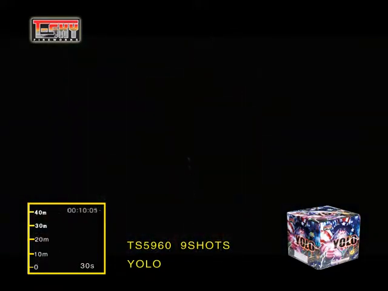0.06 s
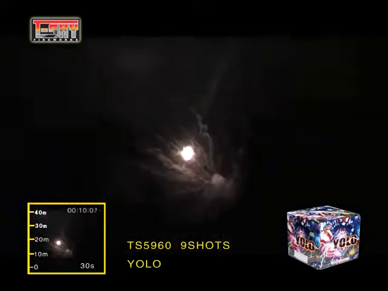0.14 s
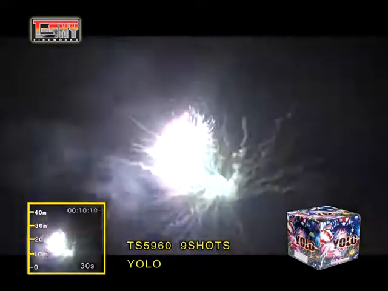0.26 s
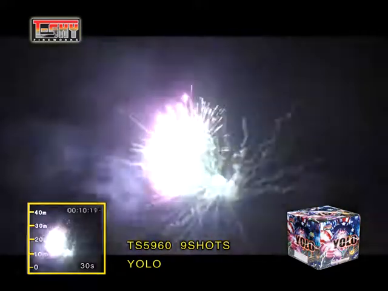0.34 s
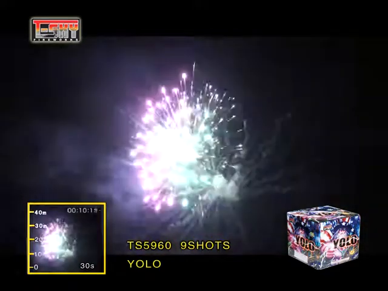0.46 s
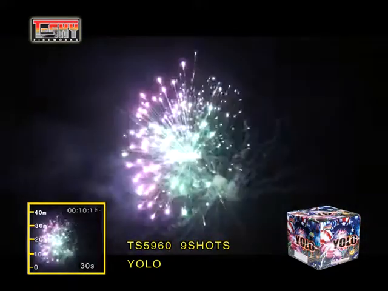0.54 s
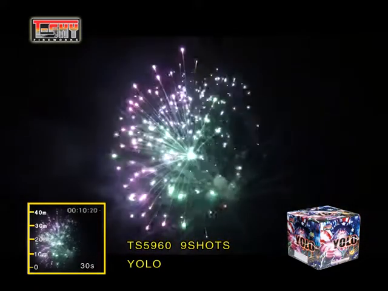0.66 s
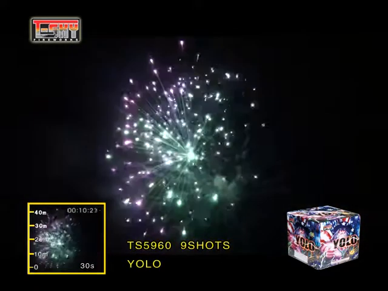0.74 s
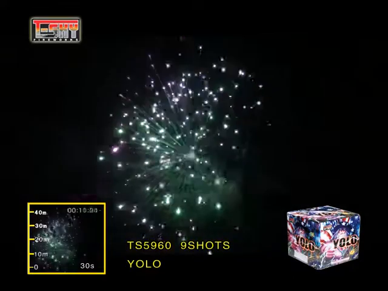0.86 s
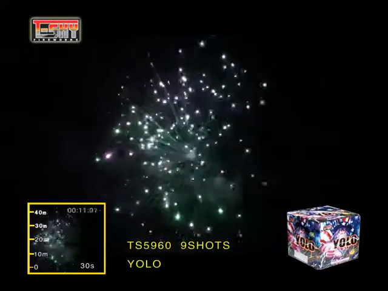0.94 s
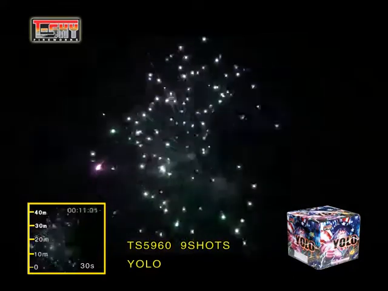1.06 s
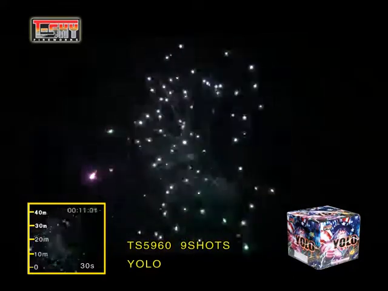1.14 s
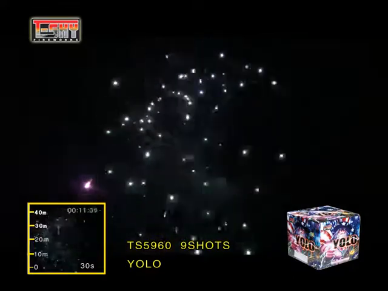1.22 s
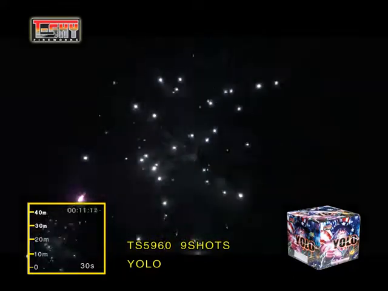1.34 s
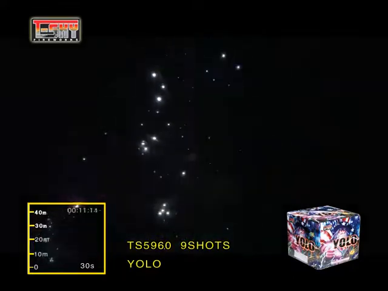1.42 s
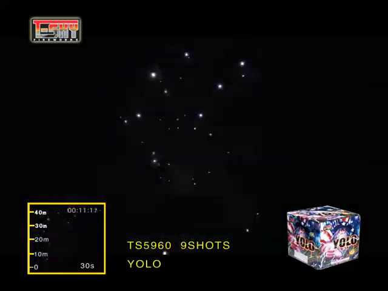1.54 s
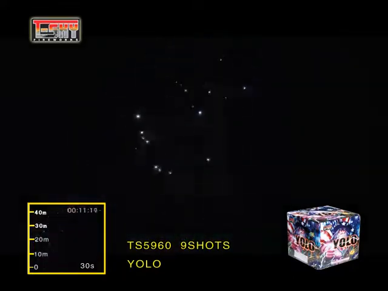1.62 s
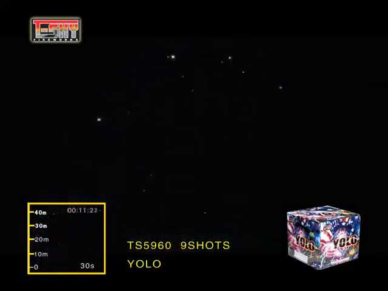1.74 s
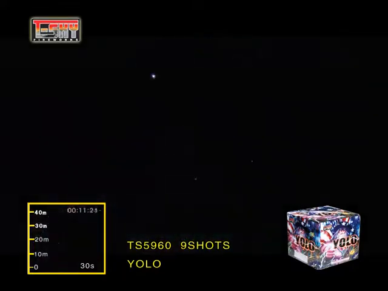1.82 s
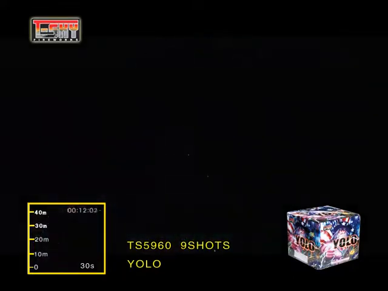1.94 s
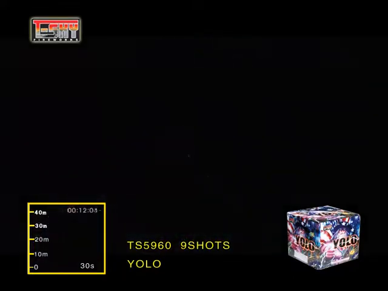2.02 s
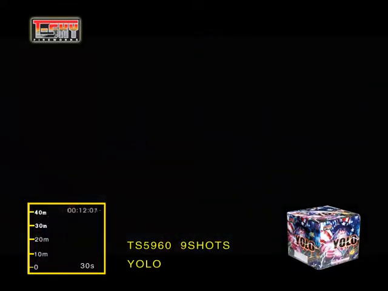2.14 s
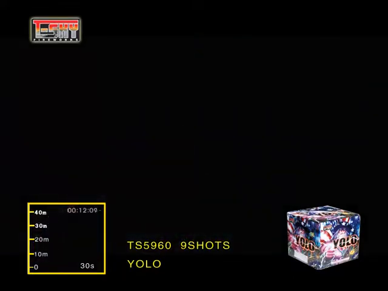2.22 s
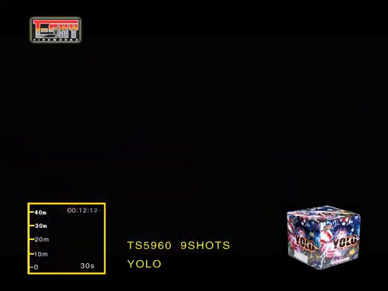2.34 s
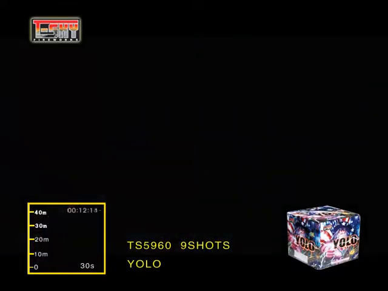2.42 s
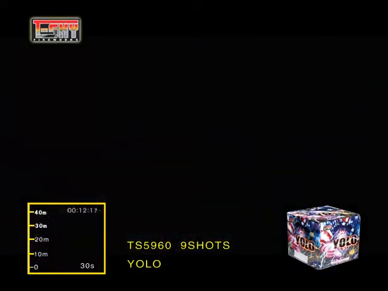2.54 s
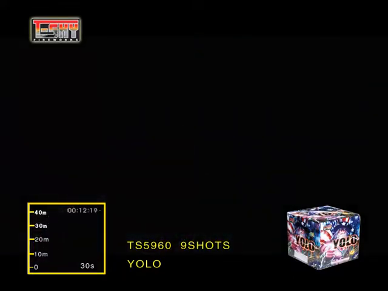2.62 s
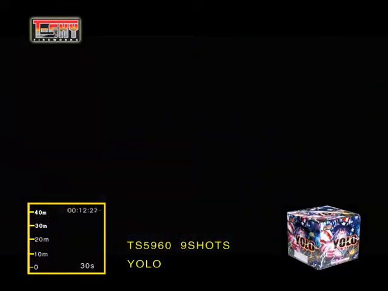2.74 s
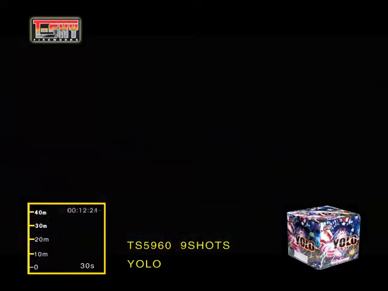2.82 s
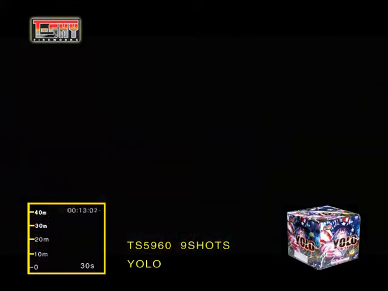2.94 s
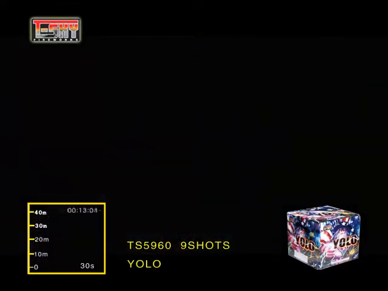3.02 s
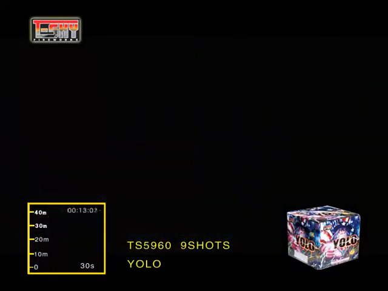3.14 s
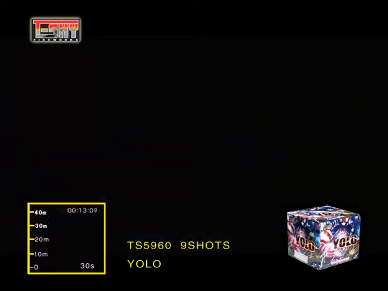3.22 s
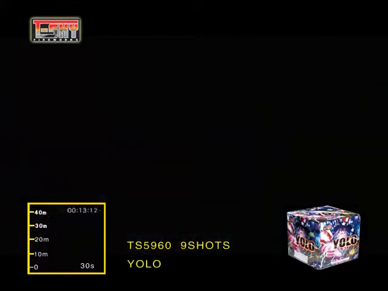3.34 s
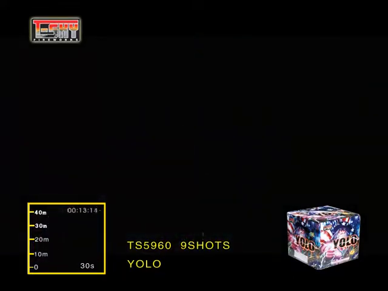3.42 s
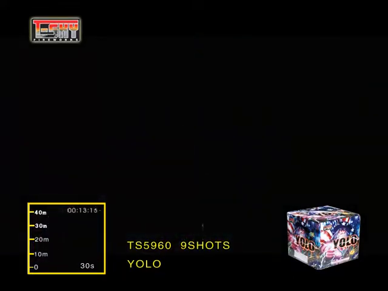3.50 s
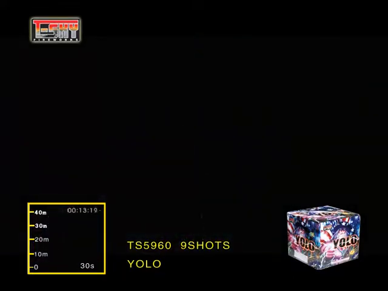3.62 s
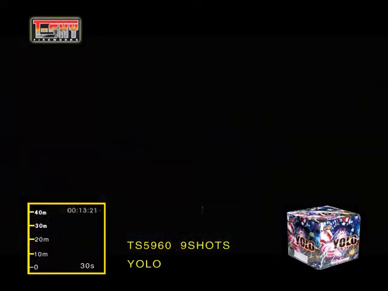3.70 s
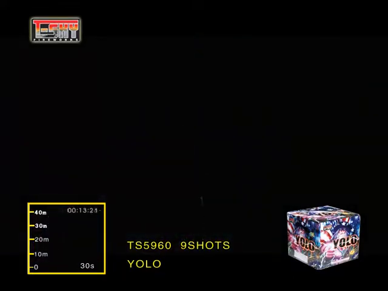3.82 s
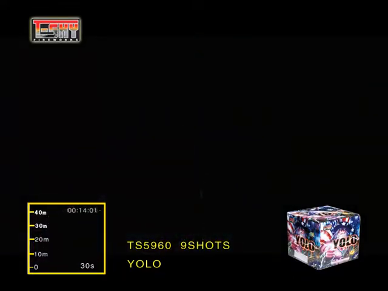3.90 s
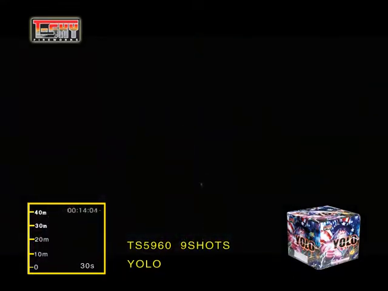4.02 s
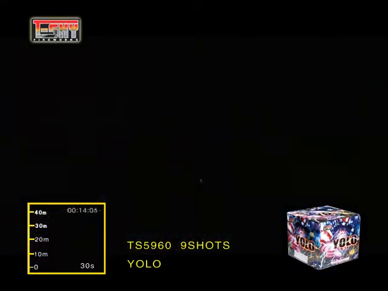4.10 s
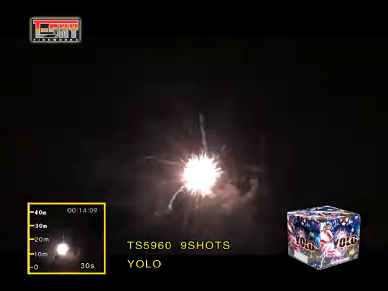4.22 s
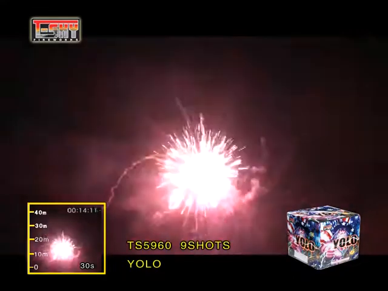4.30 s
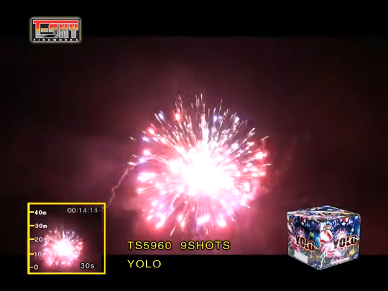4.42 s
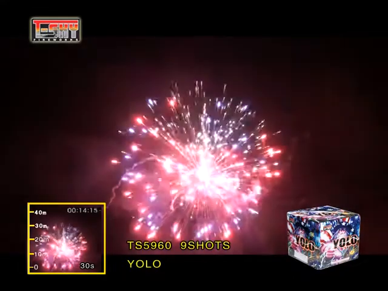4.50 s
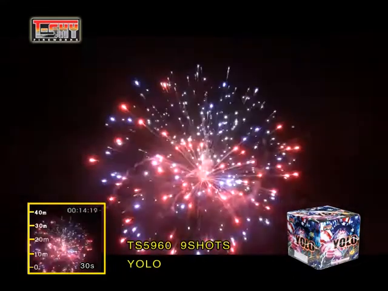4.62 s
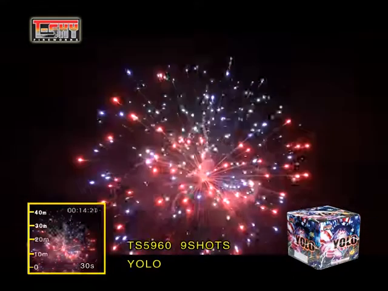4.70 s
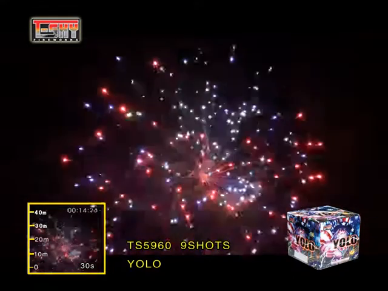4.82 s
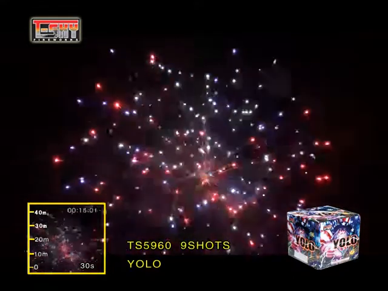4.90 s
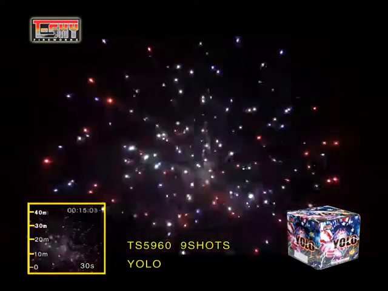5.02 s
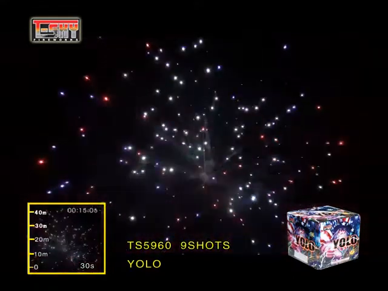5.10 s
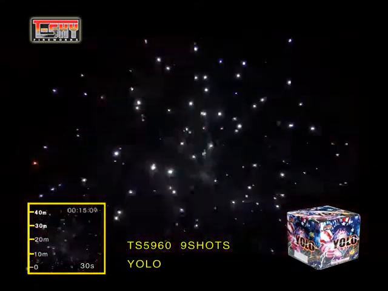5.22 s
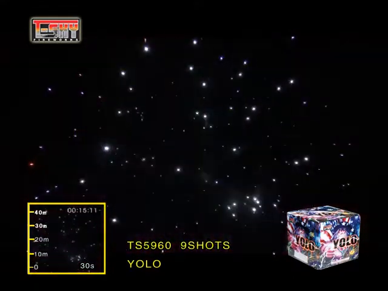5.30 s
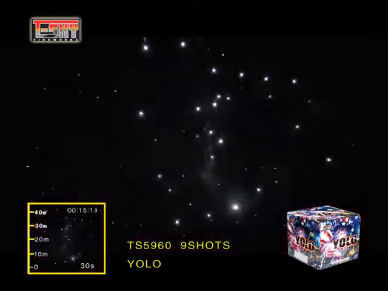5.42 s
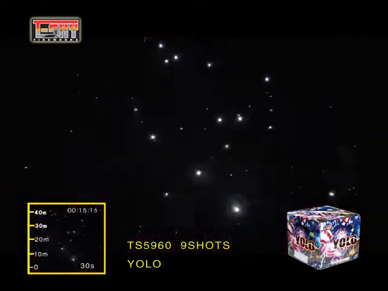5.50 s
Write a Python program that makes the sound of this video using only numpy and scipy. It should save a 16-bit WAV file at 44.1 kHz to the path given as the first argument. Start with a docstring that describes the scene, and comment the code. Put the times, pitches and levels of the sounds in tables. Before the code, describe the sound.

A night field with a low, restless rumble and a close bush cricket: a thin, raspy whirr around 8 kHz, pulsing about 24 times a second. At 0.4 s a shell bursts overhead with a hard crack, short low boom and washing roll; the camera's gain drops sharply. A strong secondary crack follows at 0.94 s with a cluster of weaker ones until 1.05 s, while trees and buildings return soft thuds. From about 1 s sparse ticks begin, swelling after 1.7 s into dense, dry crackling with louder snaps, mostly over by 2.5 s, one last at 2.7 s. At 2.57 s a mortar thumps with a spit of gas and quick slapback. The reverberation fades as the gain slowly recovers and the cricket grows clearer. At 4.4 s a second, stronger bang hits, ducking everything again, its boom echoing and rolling to the end at about 5.5 s, with a faint pop near 5.05 s.

```python
"""Firework cake in a night field

Two shells burst overhead, each a shock wave with boom, punch and scattered noise; the stars of the first end in
a crackle of tiny shocks, and a thump of the mortar lifts the second. Trees and far buildings return each report
as noise puffs. A bush cricket whirrs close by, a pulsed tone and rasp, over a low rumble of open country.
The camera's gain control ducks everything at loud bangs and slowly lets it return."""
import sys
import numpy as np
from scipy import signal
from scipy.fft import rfft, irfft
from scipy.io import wavfile
from scipy.ndimage import uniform_filter1d, minimum_filter1d

SR = 44100
rng = np.random.default_rng(int(sys.argv[2]) if len(sys.argv) > 2 else 0)


def to_wav(s):
    """Save 16-bit WAV."""
    ch = np.atleast_2d(s).T  # columns
    pcm = np.round(np.clip(ch, -1, 1) * 32767)  # PCM
    wavfile.write(sys.argv[1], SR, pcm.astype(np.int16))


N = 244755
T = np.arange(N) / SR


def undb(db):
    """Decibels to gain."""
    return 10 ** (np.asarray(db) / 20)


def add(out, start_s, sound):
    """Mix a sound in at start_s."""
    i = min(int(start_s * SR), N)
    out[..., i:i + sound.shape[-1]] += sound[..., :N - i]


def sides(pan_db):
    """Left and right gains, pan_db apart."""
    return undb(np.array([[pan_db], [-pan_db]]) / 2)


def gains(points, hz):
    """Gain of a (freq_hz, level_db) outline at the given frequencies."""
    freq_hz, level_db = np.transpose(points)
    return undb(np.interp(np.log(hz + 1), np.log(freq_hz), level_db))


# phase by which the left port leads; negative, as the field lies nearer the right: freq_hz, lead_rad
PORT_LEAD = [(40, -.5), (130, -1.2), (260, -1.6), (600, -2.0), (1200, -1.7), (3500, -.6), (6000, -.2),
             (8400, -1.3), (10500, -1.6), (11500, -.2)]


def ports(x):
    """Sound from the field reaches the right port first: a phase turn by frequency, split between channels."""
    freq_hz, lead_rad = np.transpose(PORT_LEAD)
    hz = np.fft.rfftfreq(x.shape[-1], 1 / SR)
    turn = np.exp(.5j * np.interp(np.log(hz + 1), np.log(freq_hz), lead_rad))
    return irfft(rfft(x) * [turn, 1 / turn], x.shape[-1])


def noise(colour, size, grain_db=0):
    """Stereo noise of rms 1, a shared and a weaker diffuse part; grain_db makes its arrivals unequal."""
    hz = np.fft.rfftfreq(size, 1 / SR)
    chance = np.repeat(np.tanh(rng.standard_normal(size // 20 + 1)), 20)[:size]
    grains = undb(np.clip(grain_db, 0, 10) * chance)
    spectra = rfft(rng.standard_normal((2, size)) * grains)
    front, diffuse = spectra * gains(colour, hz) * np.minimum(hz / 20, 1)
    diffuse = diffuse * undb(-8)
    x = ports(irfft([front + diffuse, front - diffuse], size))
    return x / x.std()


def scatter(colour, low_t60_s, high_t60_s, rise_s, grain_db, hold_s=0, size=131072):
    """Countless small echoes off grass and trees: build-up, hold, then decay with a T60 set by frequency."""
    t, hz = T[:size], np.fft.rfftfreq(size, 1 / SR)
    spectrum = rfft(noise(colour, size, grain_db))
    centres_hz = np.geomspace(150, 9600, 5)
    t60s = np.geomspace(low_t60_s, high_t60_s, len(centres_hz))
    out = 0
    for share, t60_s in zip(np.eye(len(centres_hz)), t60s):
        band = np.interp(np.log(hz + 1), np.log(centres_hz), share)
        decay = np.exp(-np.log(1000) * np.maximum(t - hold_s, 0) / t60_s)
        out = out + irfft(spectrum * band, size) * decay
    # trees stand in clumps, so the sound returns in surges
    clump_s, clump_db = .009, 2.5
    clumps = np.tanh(rng.standard_normal(size // 100))
    surge = undb(clump_db * np.interp(t / clump_s, np.arange(len(clumps)), clumps))
    return out * surge * (1 - np.exp(-(t / rise_s) ** 2))


def puff(colour, length_s, rise_s, grain_db, size=16384):
    """A clump of arrivals, decaying exponentially; its energy equals rms 1 over twice length_s."""
    t = T[:size]
    x = noise(colour, size, grain_db) * (1 - np.exp(-t / rise_s)) * np.exp(-t / length_s)
    return x / np.sqrt(np.sum(x ** 2) / (2 * SR * 2 * length_s))


def shock(length_s, relax_s, size=512):
    """An N-shaped pressure wave: two jumps, the second weaker; the microphone swings back from each."""
    t = T[:size]
    swing = np.exp(-t / relax_s) * np.cos(t / relax_s * np.pi / 2)
    return -swing - undb(-13.5) * np.interp(t - length_s, t, swing, left=0)


# cricket's pace: stroke_number, middle_s
STROKES = [(-1, -.006), (0, .036), (7, .331), (12, .529), (24, 1.040), (90, 3.830), (131, 5.567)]
# swells of tone within a stroke: offset_from_middle_s, width_s, level_db
SWELLS = [(-.014, .0017, -20), (-.003, 0.0049, -22.5), (.0017, 0.0019, -1)]
# colour of the wing's rasp: freq_hz, level_db
WING_COLOUR = [(4000, -29), (4600, -15.5), (5300, -23.5), (6300, -17), (7500, 0), (8400, 5), (9050, -7.5),
               (9350, -1), (9900, 1.5), (10200, -9), (10650, 1), (11100, -13), (13300, -18.5), (15000, -54)]


def cricket():
    """Each wing stroke drags a file over a scraper: a broad rasp, with swells where the wing rings."""
    number, middle_s = np.transpose(STROKES)
    phase = np.interp(T, middle_s, number)
    t = (phase - np.round(phase)) / np.gradient(phase, T)  # s from the stroke's middle
    ring = sum(undb(db) * np.exp(-.5 * ((t - at_s) / width_s) ** 2) for at_s, width_s, db in SWELLS)
    # pitch climbs as the wing speeds up, and wavers as the teeth catch unevenly
    wing_hz, waver_hz = 8290, 160
    climb_hz = 110000 * np.clip(t + .002, -.005, 0)
    waver = uniform_filter1d(rng.standard_normal(N), size=48)
    pitch_hz = wing_hz + climb_hz + waver_hz * waver / waver.std()
    cycle = 2 * np.pi * np.cumsum(pitch_hz) / SR
    lead_rad = np.interp(wing_hz, *np.transpose(PORT_LEAD))
    tone = np.sin([cycle + lead_rad / 2, cycle - lead_rad / 2])
    scrape = np.exp(-abs(t + .0047) / .0058) + undb(-16)
    stroke_force = undb(.76 * rng.standard_normal(int(number[-1]) + 2))
    force = stroke_force[np.round(phase).astype(int)]
    ringing = undb(-28.5) * (ring + undb(-30.5)) * tone
    rasp = undb(-36) * scrape * noise(WING_COLOUR, N)
    return force * (ringing + rasp) * sides(-4)


# colour of open country: freq_hz, level_db
NIGHT_COLOUR = [(25, -20), (70, -7.5), (170, 4), (300, -1.5), (460, -9), (680, -6), (1200, -14),
                (2500, -19.5), (4000, -29), (6000, -32.5), (14000, -49)]


def night():
    """A low, restless rumble of open country: noise whose level wanders."""
    knots_s = np.linspace(0, T[-1], num=60)
    wander_db = 2 * np.interp(T, knots_s, rng.standard_normal(len(knots_s)))
    return undb(-42.5) * noise(NIGHT_COLOUR, N) * undb(wander_db)


# sharp reports: two big bursts in the sky, and a small crack followed by three duller ones: start_s, shock_db,
# boom_db, body_db (mid-range), tail_db (scattered)
REPORTS = [(0.3737, 0.5, 2.5, -12.5, -7.5), (0.9387, -4, -19, -28.5, -26), (0.9821, -15, -18, -19.5, -28.5),
           (1.0107, -13, -26, -29, -38), (1.0472, -13, -28, -31.5, -42), (4.4067, 3, 4, -14.5, -9)]
# a shock and its bounces off the ground nearby: delay_s, left_db, right_db
BOUNCES = [(0, -2, 0), (.0016, -4, -3), (.0026, -12, -10), (.0054, -9, -22)]
# colours of the scattered wash, the long roll and the mid-range rasp: freq_hz, level_db
TAIL_COLOUR = [(25, -32), (60, -14.5), (120, -4.5), (210, -0.5), (330, -2), (500, -13), (700, -13),
               (1100, -19.5), (2500, -26.5), (6000, -29.5), (10000, -33.5), (15000, -50)]
ROLL_COLOUR = [(30, -26), (90, -4), (190, -4.5), (310, -9), (470, -5.5), (680, -7.5), (1200, -11),
               (3000, -17), (6000, -22), (14000, -37.5)]
RASP_COLOUR = [(200, -11.5), (440, 0), (700, 5.5), (1000, -4), (2400, -11), (4500, -25.5), (8000, -33)]


def reports():
    """Each burst: shock with ground bounces, punch with some body, low boom, wash from the trees, long roll."""
    out, t = np.zeros((2, N)), T[:SR // 5]
    boom_hz, swell_s = 212, .0038
    boom = t / swell_s * np.exp(1 - t / swell_s) * np.sin(2 * np.pi * boom_hz * t)
    punch_hz, punch_s = 480, .0018
    punch = np.exp(-t / punch_s) * np.sin(2 * np.pi * punch_hz * t)
    crack = shock(length_s=.00055, relax_s=.00017)
    for start_s, shock_db, boom_db, body_db, tail_db in REPORTS:
        for delay_s, left_db, right_db in BOUNCES:
            # later bounces have brushed more grass and come back blunter
            blunt = uniform_filter1d(np.pad(crack, 20), size=1 + int(delay_s * SR / 40))[20:]
            add(out, start_s + delay_s, undb(shock_db + np.array([[left_db], [right_db]])) * blunt)
        add(out, start_s, undb(shock_db - 6.5) * punch)
        add(out, start_s + .0026, undb(boom_db) * sides(-2.2) * boom)
        body = puff(RASP_COLOUR, length_s=.014, rise_s=.002, grain_db=2)
        add(out, start_s, undb(body_db) * body)
        wash = scatter(TAIL_COLOUR, low_t60_s=1.57, high_t60_s=1, rise_s=.009, grain_db=3, hold_s=.053)
        add(out, start_s, undb(tail_db) * wash)
        roll = scatter(ROLL_COLOUR, low_t60_s=7.3, high_t60_s=3.43, rise_s=.48, grain_db=.5)
        add(out, start_s, undb(tail_db - 15) * roll)
    return out


# colour of a returned thud: freq_hz, level_db
THUD_COLOUR = [(25, -52), (70, -13.5), (130, -0.5), (210, 2.5), (320, -4.5), (520, -23), (1200, -49.5)]


def echo(thud_db, rasp_db):
    """An obstacle returns a low thud that lingers among the trees, and a rasp."""
    length_s = .014
    thud = puff(THUD_COLOUR, length_s, rise_s=.0056, grain_db=.5)
    linger = undb(-14.5) * puff(THUD_COLOUR, length_s=.11, rise_s=.032, grain_db=6)
    rasp = puff(RASP_COLOUR, length_s, rise_s=.007, grain_db=7)
    return undb(thud_db) * (thud + linger) + undb(rasp_db) * rasp


# tree lines and walls around the field: delay_s, thud_db, rasp_db, mortar_db (offset for the mortar's echo)
REFLECTORS = [(.225, -18.5, -38, -17), (0.282, -13.5, -38, -25), (.336, -15.5, -31.5, -9),
              (.408, -16, -22.5, -14), (.615, -16, -35, -22), (.766, -20.5, -41, -21),
              (.878, -20, -29.5, -13), (.968, -26, -36, -13), (1.409, -25, -23, -19.5),
              (1.446, -23.5, -34, -12.5), (1.819, -21, -25.5, -26)]


def echoes():
    """The same obstacles answer each report, scaled by its tail, and the mortar; a distant wood answers reports."""
    out = np.zeros((2, N))
    strongest_db = max(tail_db for *_, tail_db in REPORTS)
    lift_detour_s = .054  # the mortar stands on the ground, so its echoes take a longer way
    for delay_s, thud_db, rasp_db, mortar_db in REFLECTORS:
        answer = echo(thud_db, rasp_db)
        for start_s, *_, tail_db in REPORTS:
            add(out, start_s + delay_s, undb(tail_db - strongest_db) * answer)
        add(out, LIFT_S + lift_detour_s + delay_s, undb(mortar_db) * answer)
    wood_delay_s, wood_fade_s, wood_db = 1.316, .66, -24.5  # wood_db: relative to the report's tail
    wood_thud = puff(THUD_COLOUR, wood_fade_s, rise_s=.0038, grain_db=4, size=131072)
    wood_rasp = puff(RASP_COLOUR, wood_fade_s, rise_s=.0068, grain_db=10.5, size=131072)
    wood = wood_thud + undb(-3.5) * wood_rasp
    for start_s, *_, tail_db in REPORTS:
        add(out, start_s + wood_delay_s, undb(tail_db + wood_db) * wood)
    return out


# the loudest crackling stars: start_s, level_db (before a common gain and pan)
POPS = [(1.9098, -15.5), (2.014, -11.5), (2.0514, -11), (2.0796, -12), (2.1308, -10), (2.252, -16),
        (2.368, -15), (2.392, -8), (2.4272, -11.5), (2.4527, -12), (2.5055, -12), (2.7006, -17.5),
        (5.0542, -20)]
# colour of the crackle's scatter: freq_hz, level_db
SIZZLE_COLOUR = [(60, -21), (130, 1), (220, 15), (450, 10), (700, 11.5), (1200, 4.5), (2600, -4.5),
                 (5000, -10), (8000, -28), (14000, -48.5)]


def crackle():
    """Stars pop one by one, each doubled by the ground a moment later and smeared by the trees."""
    loud_gain_db, loud_pan_db = 1, 5
    # faint stars tick sparsely, swell to a full crackle, and burn out together
    fizz_s, swell_s, full_s, burnt_out_s = 1.0, 1.66, 2.0, 2.458
    fizz_db, full_db, spread_db = -28.5, -17, 6
    full_pops_per_s, fizz_share = 230, .3
    times_s = fizz_s + np.cumsum(.5 + rng.random(size=600)) / full_pops_per_s
    trees = scatter(SIZZLE_COLOUR, low_t60_s=2, high_t60_s=.68, rise_s=.0049, grain_db=10)
    chance = np.tanh(rng.standard_normal((len(times_s), 2)))
    level_db = np.interp(times_s, [swell_s, full_s], [fizz_db, full_db]) + spread_db * chance[:, 0]
    share = np.interp(times_s, [swell_s, full_s], [fizz_share, 1])
    lit = (rng.random(len(times_s)) < share) & (times_s < burnt_out_s)
    faint = np.column_stack([times_s, level_db, 3 * chance[:, 1]])[lit]
    loud = [(start_s, db + loud_gain_db, loud_pan_db) for start_s, db in POPS]
    pops = np.vstack([loud, faint])
    out, strikes = np.zeros((2, N)), np.zeros(N)
    shapes = rng.random((len(POPS) + len(times_s), 3))
    for (start_s, db, pan_db), (height, bearing, charge) in zip(pops, shapes):
        # distance rounds each tiny shock into one swing down and up; a bigger charge swings more slowly
        width_s = .000042 * (1 + charge)
        u = (T[:40] - T[20]) / width_s
        pop = u * np.exp((1 - u ** 2) / 2)
        lag_s = (bearing - .5) * .00005
        bounce_s = .001215 + .0009 * height
        for channel, gain, when_s in zip(out, undb(db) * sides(pan_db), (start_s - lag_s, start_s + lag_s)):
            add(channel, when_s, gain * pop)
            add(channel, when_s + bounce_s, gain * undb(-4) * pop)
        strikes[int(start_s * SR)] += undb(db)
    smear = signal.fftconvolve(strikes[None], trees, axes=1)[:, :N]
    return ports(out) + undb(-30) * smear


LIFT_S = 2.5688
# walls close to the mortar: delay_s, thud_db, rasp_db
SLAPS = [(.029, -17, -19), (.078, -23, -21)]
# colour of the mortar's gas: freq_hz, level_db
MORTAR_COLOUR = [(30, -21), (120, -23), (260, -0.5), (450, 2.5), (750, 2.5), (1300, -5), (2600, -13.5),
                 (7000, -25), (14000, -33)]


def lift():
    """The mortar thumps out the next shell with a spit of gas; walls close by slap back, the field rings on."""
    out = np.zeros((2, N))
    add(out, LIFT_S, undb(-8) * sides(-3) * shock(length_s=.0009, relax_s=.0005))
    gas = puff(MORTAR_COLOUR, length_s=.013, rise_s=.0003, grain_db=5)
    add(out, LIFT_S, undb(-17) * gas)
    near_field = scatter(MORTAR_COLOUR, low_t60_s=.34, high_t60_s=.33, rise_s=.037, grain_db=4)
    add(out, LIFT_S, undb(-17) * near_field)
    far_field = scatter(MORTAR_COLOUR, low_t60_s=3.3, high_t60_s=4.26, rise_s=.025, grain_db=7)
    add(out, LIFT_S, undb(-31) * far_field)
    for delay_s, thud_db, rasp_db in SLAPS:
        add(out, LIFT_S + delay_s, echo(thud_db, rasp_db))
    return out


def scene():
    """Everything that reaches the camera."""
    return cricket() + night() + reports() + echoes() + crackle() + lift()


def record(dry):
    """Gain drops just ahead of a loud bang and creeps back; peaks are rounded and the top is cut."""
    ceiling_db, recovery_db_per_s, top_hz = -8.2, 4.2, 14200
    loudness = uniform_filter1d(abs(dry).mean(axis=0), size=64)
    over_db = np.maximum(20 * np.log10(loudness + 1e-9) - ceiling_db, 0)
    # hold the largest excess, released at a steady rate
    recovery_db = recovery_db_per_s * T
    held_db = np.maximum.accumulate(over_db + recovery_db) - recovery_db
    gain = uniform_filter1d(minimum_filter1d(undb(-held_db), size=600), size=200)
    rounded = .7 * np.tanh(dry * gain / .7)
    low_pass = signal.ellip(8, .2, 80, top_hz, fs=SR, output="sos")
    return signal.sosfilt(low_pass, rounded)


dry = scene()
out = record(dry)
to_wav(out)
```